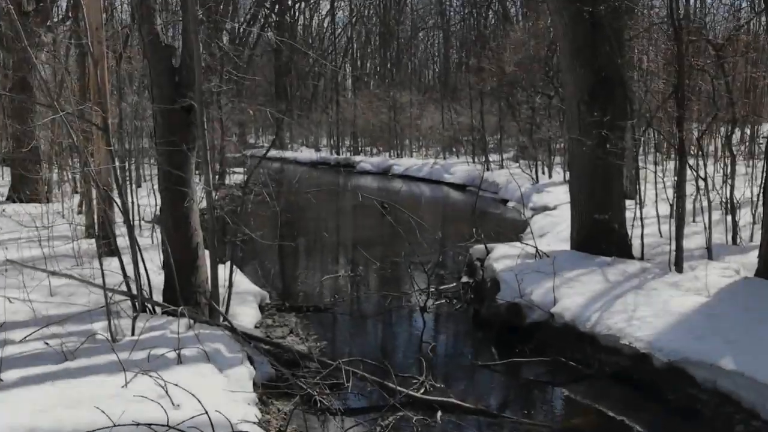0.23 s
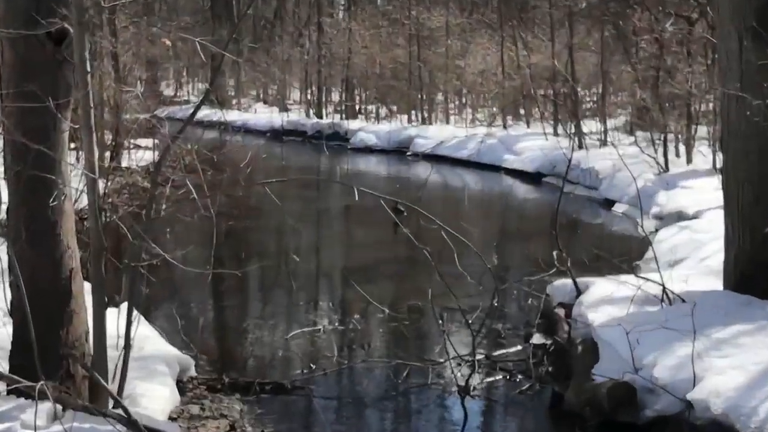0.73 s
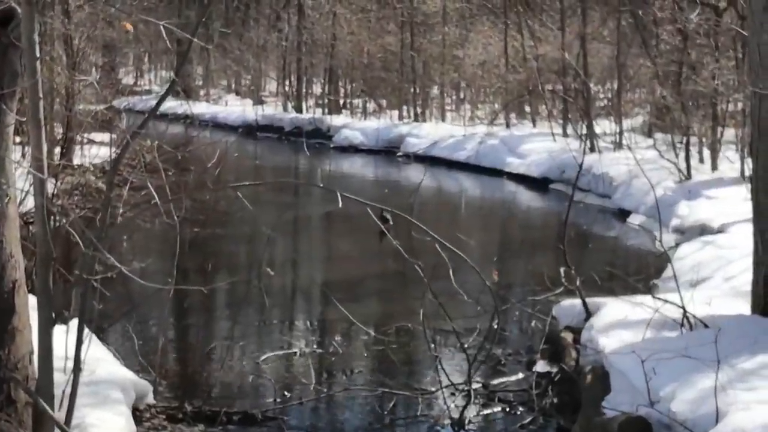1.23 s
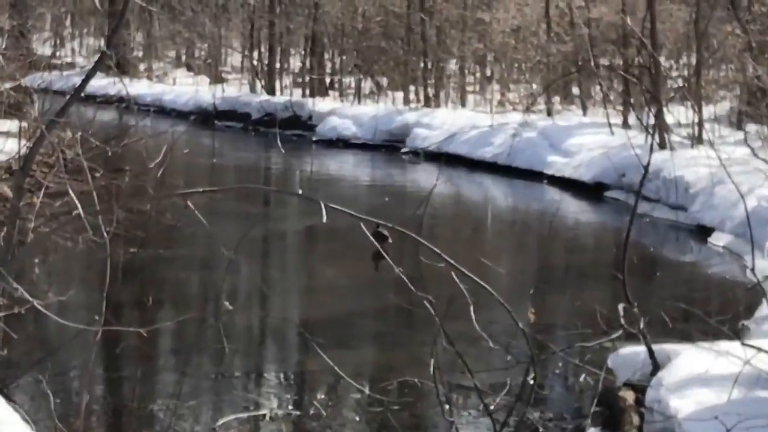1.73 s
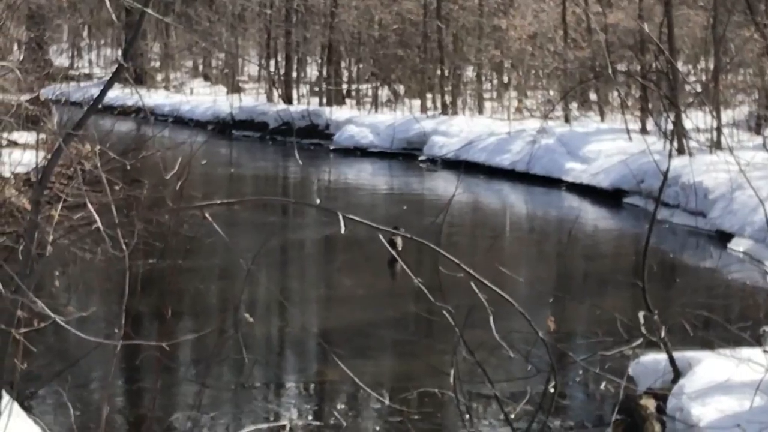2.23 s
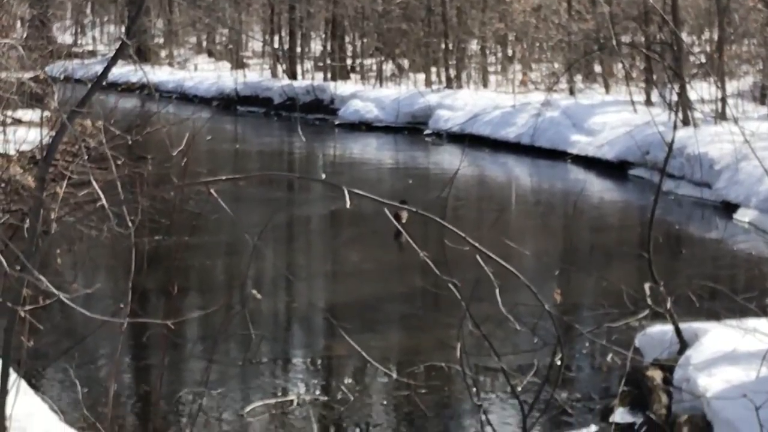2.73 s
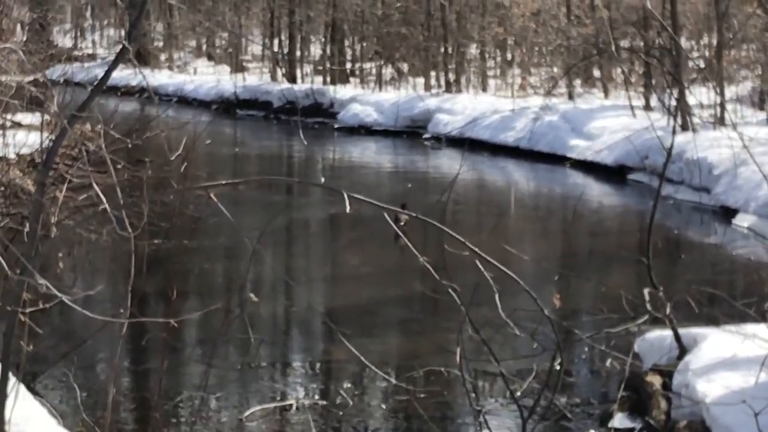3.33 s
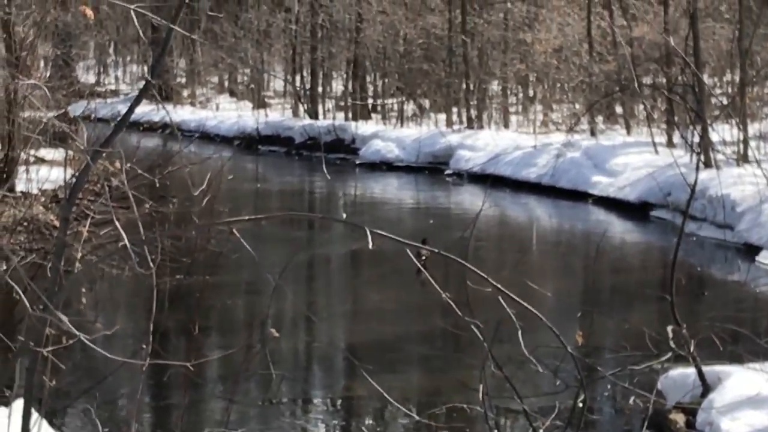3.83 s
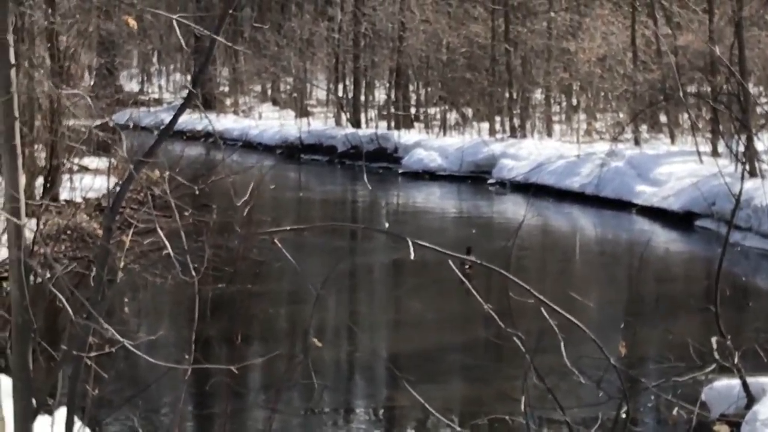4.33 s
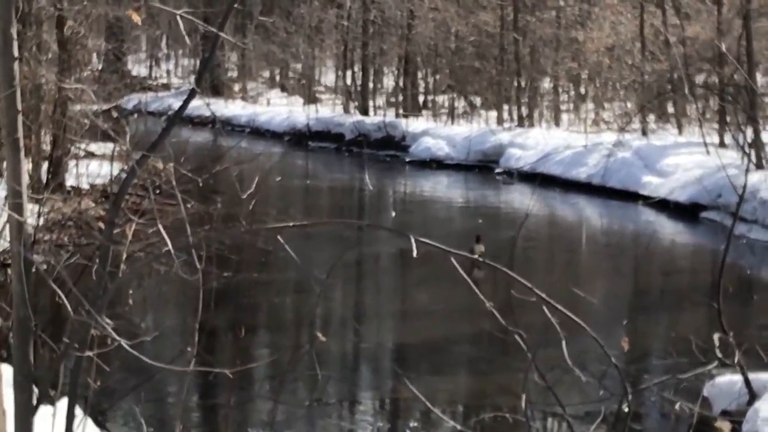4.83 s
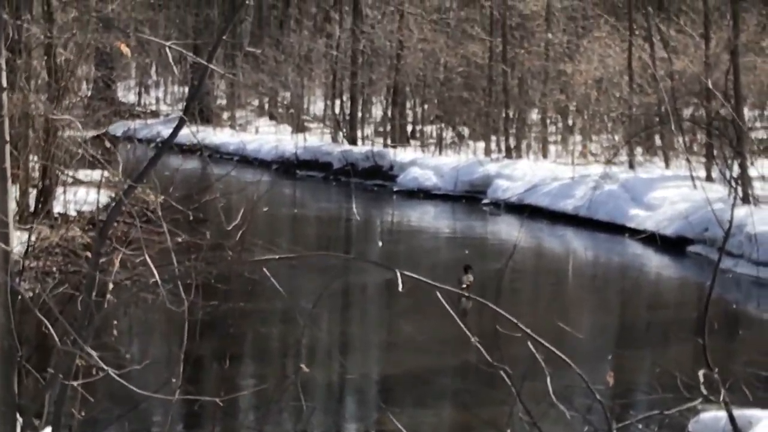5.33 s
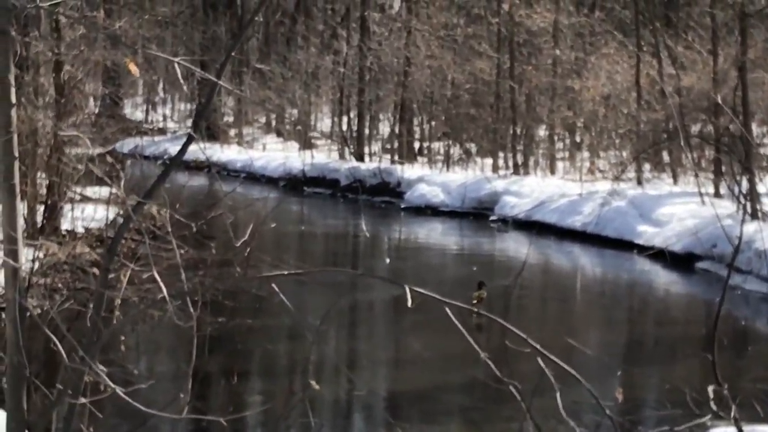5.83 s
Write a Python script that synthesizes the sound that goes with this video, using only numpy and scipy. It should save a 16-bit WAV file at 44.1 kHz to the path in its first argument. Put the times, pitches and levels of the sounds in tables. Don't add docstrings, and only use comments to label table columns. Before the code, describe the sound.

A duck quacks steadily, eleven raspy nasal quacks echoing faintly through bare woods, over wind rumble, soft microphone thumps and a low creek hiss.

```python
import sys
import numpy as np
from scipy import signal
from scipy.io import wavfile
from scipy.ndimage import uniform_filter1d

SR = 44100
rng = np.random.default_rng(int(sys.argv[2]) if len(sys.argv) > 2 else 0)


def amplitude_ratio(level_db):
    exponent = np.asarray(level_db, float) / 20
    return 10 ** exponent


def inscribe(sig):
    pcm = np.round(np.clip(np.atleast_2d(sig).T, -1, 1) * 32767)
    wavfile.write(sys.argv[1], SR, pcm.astype(np.int16))


N = 268348

# (time [s], peak [dB], pitch [Hz], crack [dB])
THUMPS = [(0.167, -50, 96, -43), (0.281, -32.5, 59.5, -14.5), (0.341, -34, 69, -31), (0.451, -30, 159, 3),
          (0.469, -29, 93, -9), (0.804, -23.5, 135, -2.5), (0.824, -28.5, 72, -1.5),
          (1.006, -29.5, 103, -18), (1.3, -36, 65.6, -23), (1.484, -36, 115, -12), (2.026, -30, 50.7, -24),
          (2.077, -32, 85.6, -11), (2.114, -36, 75, -26), (2.375, -26.5, 67.6, -7), (2.401, -18.5, 60, -18),
          (2.420, -23, 63.6, -11.5), (2.459, -22, 69, -14.5), (3.404, -29.5, 131, -12.5),
          (4.239, -34.5, 51, -27), (4.298, -40, 70, -34), (4.331, -34, 69, -38), (4.408, -40, 78.4, -33),
          (4.814, -31.5, 59.4, -50), (4.907, -39, 91, -31), (4.923, -30, 64, -34),
          (5.101, -26.5, 105, -12.5), (5.223, -38, 62.6, -36), (5.667, -32, 52.7, -8),
          (5.956, -23.5, 73, -18.5), (5.991, -22.5, 75.4, -40)]
SLAP_S = 0.027


def evened(x):
    return x / np.sqrt(np.mean(x ** 2) + 1e-20)


def read(points, hz):
    f, value = np.transpose(points)
    return np.interp(np.log(hz + 1), np.log(f + 1), value)


def add(mix, s, sound):
    part = mix[max(round(s * SR), 0):][:len(sound)]
    part += sound[:len(part)]


def drift(count, smooth):
    noise = rng.standard_normal(count)
    return evened(uniform_filter1d(uniform_filter1d(noise, smooth), smooth))


def coloured(x, points, size=4096):
    gain_db = read(points, abs(np.fft.fftfreq(size, 1 / SR)))
    log_gain = np.log(amplitude_ratio(np.maximum(gain_db, -100)))
    taps = np.fft.ifft(np.exp(np.conj(signal.hilbert(log_gain)))).real
    return signal.oaconvolve(x, taps[:size // 2])[:len(x)]


def resonate(x, hz, width):
    turn = np.exp(2j * np.pi * np.cumsum(hz * np.ones(len(x))) / SR)
    r = np.exp(-np.pi * width / SR)
    return 2 * (turn * signal.lfilter([1 - r], [1, -r], x / turn)).real


def steep(x, hz, width):
    return resonate(resonate(resonate(x, hz, width), hz, width), hz, width)


def windpipe(snaps, tension, t, attack_s):
    # (frequency [Hz], slack level [dB], tight level [dB])
    throat = [(244, -75, -67), (527, -2, -14), (880, -5.5, -10.5), (1140, 4, -18.5), (1686, -2.5, -7),
              (1865, 8.5, 7), (2067, 4, -8.5), (2470, 3.5, 2), (2990, -33, -25), (3450, -45, -78.5),
              (4830, -56, -80)]
    slack, tight = (evened(coloured(snaps, np.array(throat)[:, [0, k]])) for k in (1, 2))
    shut_hz, open_hz, width_hz, share = 1450, 2060, 500, 0.35
    gape_hz = open_hz - (open_hz - shut_hz) * np.exp(-(t / attack_s) ** 2)
    gape = evened(resonate(slack, gape_hz, width_hz))
    slack = evened((1 - share) * slack + share * gape)
    return (1 - tension) * slack + tension * tight


def bill_hiss(puffs, tilt_db):
    # (frequency [Hz], width [Hz], level [dB])
    cavities = [(5300, 230, 8), (6040, 1780, 9.5), (8910, 1480, 7.5), (11100, 1000, -3)]
    return evened(sum(amplitude_ratio(db + tilt_db * (f > 7000)) * steep(puffs, f, 1.15 * w) for f, w, db in cavities))


def quack(start, length, hold_db, top_hz, attack_s, scoop_hz, scoop_s, chest_db, ring_db, bill_db, tilt_db):
    # (frequency [Hz], level [dB])
    hum_colour = [(150, -33.5), (345, -12), (700, 3), (1050, 3), (1400, 4), (1750, -0.5), (2100, 3),
                  (2450, -1.5), (2800, -17), (3500, -60), (4200, -56.5)]
    t = np.arange(0, length + 0.013, 1 / SR)

    hz = top_hz * (1 + 0.0067 * drift(9000, 700)[:len(t)])
    hz = hz - scoop_hz * np.exp(-(t / scoop_s) ** 1.6) + 20 * (t - length)
    tension = np.clip((hz - 150) / 21, 0, 1)

    attack_db, sag_db, shut_db, shut_s = -10, -1, -44, 0.0068
    effort_db = hold_db + attack_db * np.maximum(1 - t / attack_s, 0) ** 0.95
    effort_db = effort_db + sag_db * np.exp(-((t / length - 0.57) / 0.12) ** 2)
    effort_db = effort_db + shut_db * np.clip((t - length) / shut_s, 0, 1)

    noise = rng.standard_normal(9000)[:len(t)]
    wobble, shake = drift(9000, 130)[:len(t)], drift(9000, 130)[:len(t)]
    jitter = .007 + .006 * np.exp(-t / .05)
    shimmer_db = 1.3
    breath = .42 + .35 * np.exp(-(t / attack_s) ** 2)
    turns = np.cumsum(hz * (1 + jitter * wobble)) / SR

    puffs = evened((np.exp(-(turns % 1) / .1) + .5 * np.exp(-((turns + .5) % 1) / .1) + .06) * noise)
    order = np.arange(1, 29)[:, None]
    snaps = evened(np.cos(2 * np.pi * order * turns).sum(0))
    snaps = snaps * amplitude_ratio(shimmer_db * shake) + breath * puffs
    hums = evened(np.cos(4 * np.pi * order[:14] * (turns + .1)).sum(0))
    hums = hums * np.minimum(t / attack_s + .2, 1) + .7 * breath * puffs

    opening = np.minimum(t / (0.69 * attack_s), 1) ** 2.0
    slack_db, tight_db = -7.5, 1.5
    hum_db = slack_db + (tight_db - slack_db) * tension
    voice = opening * windpipe(snaps, tension, t, attack_s)
    voice += amplitude_ratio(hum_db) * evened(coloured(hums, hum_colour))
    voice /= np.sqrt(1 + amplitude_ratio(2 * hum_db))

    chest = amplitude_ratio(chest_db) * (0.6 + 0.4 * tension) * np.sin(4 * np.pi * turns)
    ring = amplitude_ratio(ring_db) * opening * (0.21 + 0.31 * tension) * evened(steep(snaps + puffs, 3340, 680))
    brighten_db, air_db = 6.5, -35
    hiss = amplitude_ratio(bill_db + brighten_db * (t / length - 1.5)) * bill_hiss(puffs, tilt_db)
    bill = opening * (hiss + amplitude_ratio(air_db) * evened(np.gradient(noise)))

    puff_db, puff_s, puff_hz, puff_width_hz = -15, 0.055, 860, 900
    puff = amplitude_ratio(hold_db + puff_db) * np.exp(-(t / puff_s) ** 2)
    puff = puff * evened(steep(noise, puff_hz, puff_width_hz))
    return (amplitude_ratio(effort_db) * (voice + chest + ring + bill) + puff) * signal.windows.tukey(len(hz), .05)


def yelp(length, top_hz, level_db, dip_db):
    side = 2 * np.arange(0, length, 1 / SR) / length - 1
    hz = top_hz * (1 - .25 * abs(side) ** 2.4)
    edge_db, dip_width = -4, .15
    level_db = level_db + edge_db * side ** 4 + dip_db * np.exp(-(side / (2 * dip_width)) ** 2)
    turns = np.cumsum(hz * (1 + .022 * drift(6000, 70)[:len(hz)])) / SR
    partials = [(.5, 0.0), (1, 15.5), (2, -35)]  # (multiple of the pitch, dB)
    note = sum(amplitude_ratio(db) * np.sin(2 * np.pi * k * turns) for k, db in partials)
    husk_db = 3.6 * drift(6000, 150)[:len(hz)]
    return amplitude_ratio(level_db - 2.0 + husk_db) * note * signal.windows.tukey(len(hz), .2)


def woods(x):
    # (frequency [Hz], 60 dB decay time [s], level [dB])
    decay = [(300, .9, -2), (1000, 1.3, -1), (2000, 1.5, 0), (2600, 1.1, -2), (3500, .8, -1),
             (6000, 1.0, 12), (7500, .6, 4), (9000, .3, -4), (12000, .25, -4)]
    tail_db, early_db = -15.5, -21
    clumps_db = 2.5 * drift(SR, 500)
    taps = rng.standard_normal(SR) * (np.arange(SR) > 300) * amplitude_ratio(clumps_db)
    hz, t, z = signal.stft(taps, SR, nperseg=256)
    f, t60, colour_db = np.transpose(decay)
    fade_db = np.interp(hz, f, colour_db)[:, None] - 60 * t / np.interp(hz, f, t60)[:, None]
    tail = signal.istft(z * amplitude_ratio(fade_db), SR, nperseg=256)[1][:SR]
    early = taps * amplitude_ratio(-np.arange(SR) / SR * 190.0)
    room = amplitude_ratio(tail_db) * tail / np.linalg.norm(tail) + amplitude_ratio(early_db) * early / np.linalg.norm(early)
    smear = evened(1 + .45 * drift(N, 220))
    return signal.fftconvolve(x * smear, room)[:N]


def thump(peak_db, hz, crack_db, length=SLAP_S):
    t = np.arange(round(.2 * SR)) / SR
    wobble, noise = drift(len(t), 200), rng.standard_normal(len(t))
    swing_hz = 48 + 1.365 * max(hz - 52, 8) * np.exp(-t / (0.98 * length)) + 32 * np.exp(-t / 0.0094)
    turns = np.cumsum(swing_hz * (1 + 0.27 * wobble)) / SR
    swings = -np.sin(2 * np.pi * turns) * np.minimum(t / 0.0062, 1) * np.exp(-(t / length) ** 1.09)
    crack = steep(noise * np.exp(-(t / (.5 * length)) ** 2), 246, 210)
    return amplitude_ratio(peak_db) * (swings + amplitude_ratio(crack_db - 3.0) * crack / abs(crack).max())


def tick(peak_db, hz, length):
    t = np.arange(8000) / SR
    burst = rng.standard_normal(len(t)) * np.sqrt(t) * np.exp(-1.6 * t / max(length, .0005))
    snap = steep(burst, hz, min(2.0 * hz, 5000)) + hz / 60000 * burst
    return amplitude_ratio(peak_db - 9.5) * snap / abs(snap).max()


def wind(lumps_db=4.5, gusts_db=2.2):
    # (time [s], rumble level [dB])
    strength = [(0.0, -46), (0.41, -56.5), (0.83, -58), (0.9, -59), (2.03, -56.5), (2.25, -50),
                (2.37, -45.5), (2.66, -61.5), (2.89, -61.5), (3.23, -54), (3.56, -66), (3.88, -60.5),
                (4.38, -47), (4.61, -52.5), (5.03, -51.5), (5.42, -56), (5.79, -54.5), (6.08, -40)]
    # (frequency [Hz], level [dB per Hz])
    rumble = [(12, -21.5), (20, -19), (49, 5.5), (70, 2.5), (118, -5.5), (157, -10.5), (232, -25.5),
              (382, -41.5), (500, -74), (650, -75), (1100, -120)]
    s, level_db = np.transpose(strength)
    t = np.arange(N) / SR
    eddies = rng.standard_normal(N) * amplitude_ratio(lumps_db * drift(N, 500) + gusts_db * drift(N, 2500))
    low = evened(coloured(eddies, rumble, size=16384))
    high = evened(steep(eddies, 201.6, 166))
    swell_db, swell_s = 24, 0.019
    slaps = sum(amplitude_ratio(crack_db) * np.exp(-((t - at - SLAP_S / 2) / swell_s) ** 2)
                for at, _, _, crack_db in THUMPS)
    high = amplitude_ratio(-7 - 11.5) * (1 + amplitude_ratio(swell_db) * slaps) * high
    return amplitude_ratio(np.interp(t, s, level_db) + 4.5) * (low + high)


def hush(patchy_db=2.0, flicker_db=0.42):
    # (time [s], level [dB])
    settling = [(0.0, -78.5), (.47, -78.5), (.66, -75.5), (1.2, -74), (1.9, -72), (3.0, -72.5),
                (5.2, -70.5), (6.08, -72.5)]
    # (frequency [Hz], level [dB per Hz])
    colour = [(120, -19), (200, 8.5), (231, -2.5), (283, -6), (859, -12.5), (1190, -14.5), (1330, -15),
              (1850, -15.5), (2020, -23.5), (2420, -20), (2560, -23.5), (2810, -22.5), (5020, -30),
              (6720, -30), (15500, -33)]
    frames, hz = N // 128 + 6, np.fft.rfftfreq(512, 1 / SR)
    a, b, patches = rng.standard_normal((frames, 257, 3)).T
    patches = evened(uniform_filter1d(uniform_filter1d(patches, 8, 0), 20, 1))
    shade_db = read(colour, hz)[:, None] + patchy_db * patches + flicker_db * drift(frames, 4)
    z = (a + 1j * b) * amplitude_ratio(shade_db)
    z /= np.sqrt(np.mean(abs(z[hz > 3000]) ** 2))
    hiss = signal.istft(z, nperseg=512, noverlap=384)[1][:N] / 512
    s, level_db = np.transpose(settling)
    return amplitude_ratio(np.interp(np.arange(N) / SR, s, level_db) + 36) * hiss


def scene():
    # (start [s], length [s], effort [dB], top pulse rate [Hz])
    quacks = [(0.033, .146, -51.5, 171.2), (.594, .166, -48, 174.6), (1.178, .169, -43, 171.6),
              (1.768, .169, -42, 178), (2.349, .166, -42, 179), (2.924, .17, -40.5, 175.3),
              (3.525, .171, -41.5, 174.6), (4.11, .171, -42, 179.2), (4.707, .177, -42.5, 181.2),
              (5.324, .162, -42, 177.6), (5.912, .19, -40.5, 177.7)]
    # (attack [s], depth of the upward scoop [Hz], scoop time [s])
    onsets = [(0.036, 32.15, 0.055), (0.044, 35.9, 0.048), (0.043, 49.56, .06), (0.032, 47.97, .055),
              (0.036, 46.13, .062), (0.041, 49.75, .055), (0.041, 45.9, 0.058), (0.058, 29.87, .075),
              (0.036, 49.13, .065), (0.036, 46.43, .058), (0.046, 55.8, 0.055)]
    # (chest tone [dB], upper ring [dB], bill hiss [dB], hiss tilt above 7 kHz [dB])
    aspects = [(-13, -21, -20, 7), (-16, -22, -18, 2), (-12, -18, -18, -3), (-12.5, -23.5, -17.5, 1),
               (-21, -15.5, -16.5, 0.5), (-9.5, -11, -12, 4), (-13, -15.5, -16, -1),
               (-13.5, -19.5, -15.5, -2), (-14.5, -20.5, -17, -7), (-46, -15, -18.5, -3.5),
               (-58, -14.5, -20.5, -2.5)]
    # (start [s], length [s], top pitch [Hz], level [dB], dip at the arch top [dB])
    yelps = [
        (.915, .125, 1400, -72.5, -3),
        (1.33, .06, 1420, -70, -9),
        (1.642, .102, 1465, -67, -13),
        (1.978, .094, 1440, -68.5, -15),
    ]
    # (time [s], peak [dB], pitch [Hz], length [s])
    ticks = [(0.013, -53, 3630, 0.0035), (0.138, -64, 3530, 0.003), (0.178, -45, 4270, 0.0017),
             (0.185, -35, 3980, 0.0046), (0.217, -55, 9710, 0.003), (0.3094, -73, 4160, 0.0032),
             (0.4643, -72, 3660, 0.003), (0.627, -52, 5890, 0.0034), (0.664, -47.5, 8800, 0.004),
             (0.7816, -46, 3540, 0.003), (0.947, -50, 8640, 0.0034), (0.957, -49, 3540, 0.0036),
             (1.09, -51, 6000, 0.0022), (1.469, -39, 6070, 0.0011), (1.5818, -62, 4120, 0.003),
             (2.283, -46.5, 3600, 0.0044), (2.3446, -72, 3890, 0.0033), (2.867, -44, 3600, 0.0021),
             (3.2021, -46, 5270, 0.0023)]
    # (time [s], peak [dB], pitch [Hz], length [s])
    knocks = [
        (1.467, -40, 610, 0.0045),
        (2.2, -46, 600, 0.002),
        (.43, -58, 12800, 0.083),
        (.498, -51.5, 4700, 0.023),
        (.71, -54, 13000, 0.034),
    ]
    duck, far, near = np.zeros(N), np.zeros(N), np.zeros(N)
    for row, onset, aspect in zip(quacks, onsets, aspects):
        add(duck, row[0], quack(*row, *onset, *aspect))
    for s, *how in yelps:
        add(far, s, yelp(*how))
    for s, *how in THUMPS:
        add(near, s, thump(*how))
    for s, *how in [*ticks, *knocks]:
        add(near, s, tick(*how))
    echoes = woods(duck + amplitude_ratio(3) * far)
    return (duck + far + echoes + near + wind() + hush())[None]


def roll_off(x):
    return signal.sosfilt(signal.butter(12, 15690, fs=SR, output="sos"), x)


def record(dry):
    # (frequency [Hz], width [Hz], share removed [0-1])
    port_dip = (10520, 460, 0.48)
    cut = signal.sosfilt(signal.butter(2, 28, "highpass", fs=SR, output="sos"), dry[0])
    hz, width, share = port_dip
    mix = (cut - share * resonate(cut, hz, width))[None]
    return roll_off(mix)


dry = scene()
out = record(dry)
inscribe(out)
```